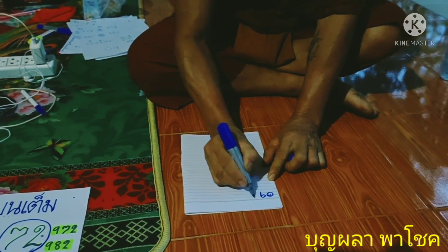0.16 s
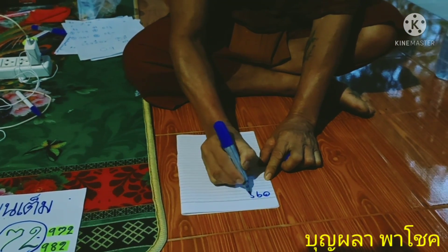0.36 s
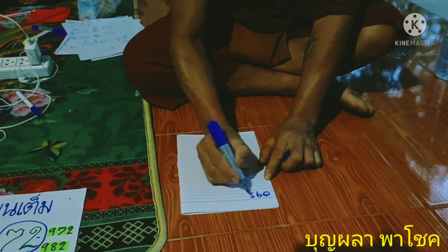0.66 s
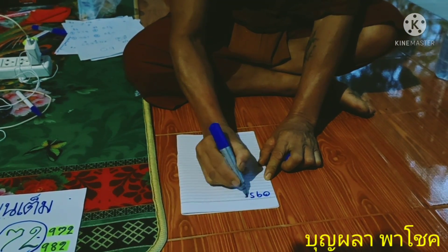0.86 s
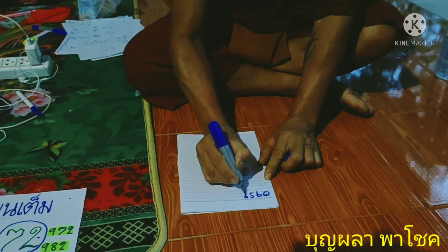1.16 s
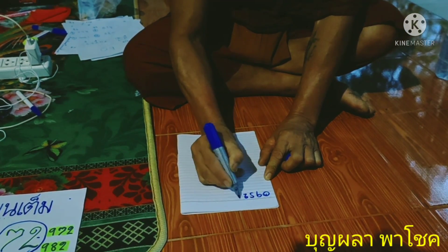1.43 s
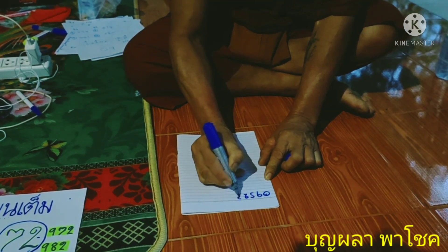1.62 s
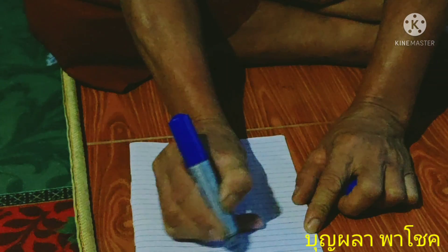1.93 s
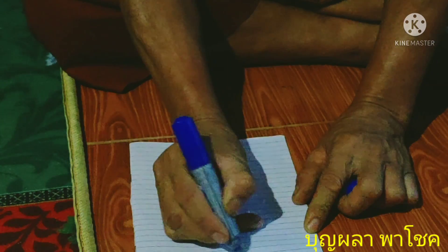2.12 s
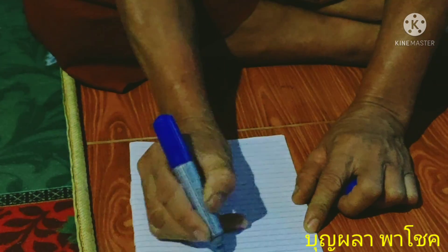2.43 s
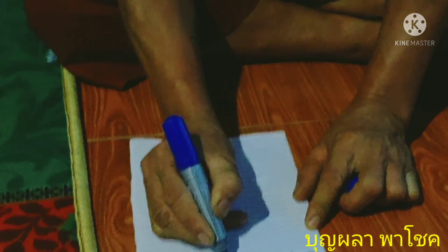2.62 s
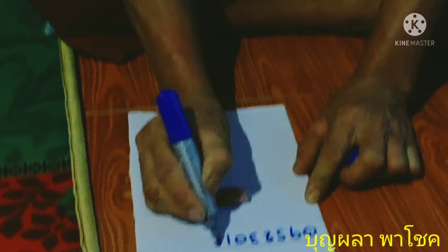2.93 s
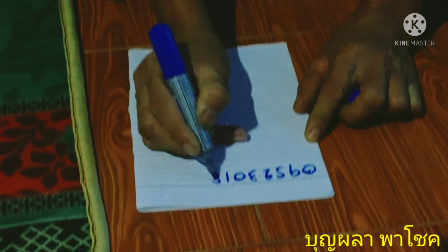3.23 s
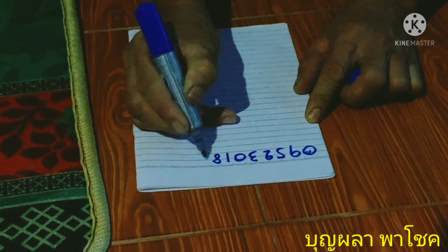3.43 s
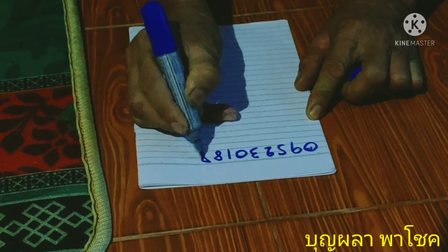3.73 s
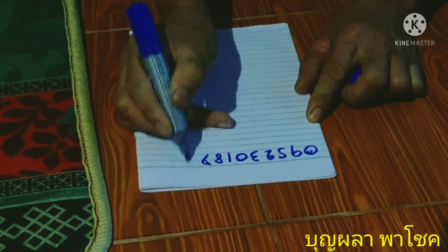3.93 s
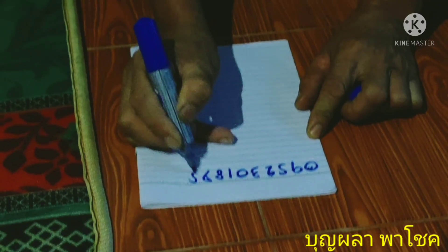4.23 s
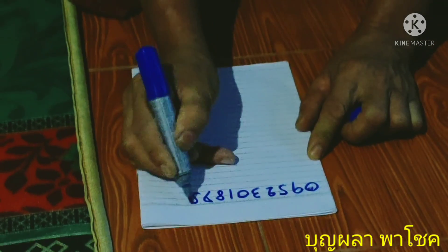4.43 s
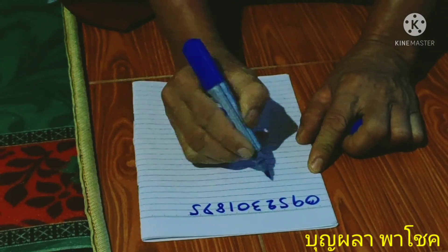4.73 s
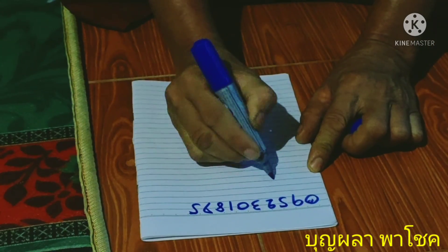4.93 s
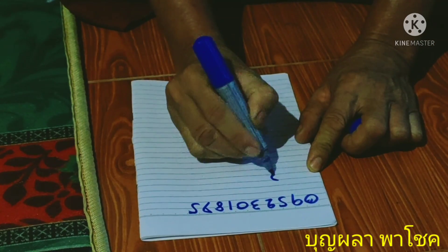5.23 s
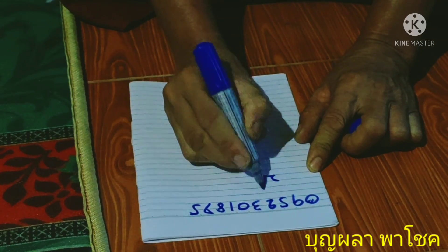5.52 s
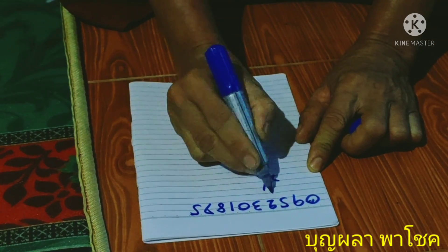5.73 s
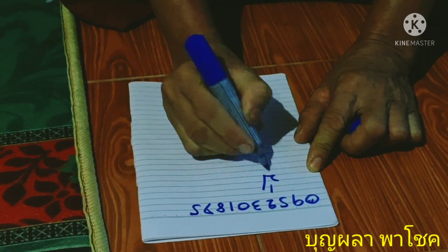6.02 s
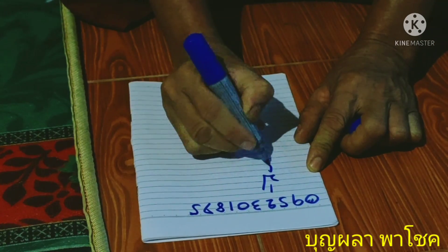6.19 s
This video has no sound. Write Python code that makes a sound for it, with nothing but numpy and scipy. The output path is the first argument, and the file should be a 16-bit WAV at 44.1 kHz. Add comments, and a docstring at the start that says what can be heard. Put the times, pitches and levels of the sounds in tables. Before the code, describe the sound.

A continuous night insect chorus fills about 6.4 seconds, heard from an open porch through a slightly hissy stereo phone microphone. Crickets around 4.5 kHz beat and pulse together, a higher bush-cricket rasps in half-second bouts, and thin fluttering trills slide downward near 5.8 kHz. A felt marker close by ticks and scrapes on a paper pad in quick strokes from 0 to 1.9 s, pauses, then resumes from 2.8 s, with sharper taps at 5.1 and 5.9 s. Soft hand rubs accompany it, clearest near 4.6 s. Distant crickets thicken from about 1.4 s. A gecko gives seven short falling clucks from 2.1 to 3.6 s, weakening. Five bright triple chirps follow from 4.3 to 5.2 s, with faint hollow frog croaks at 4.6, 4.9 and 5.2 s. A distant engine drones low, easing near 4.5 s, then picking up.

```python
"""Night chorus from an open porch

Crickets trill all round, close and far; a bush-cricket rasps in bouts and thin trills slide downwards.
A gecko clucks, a field cricket chirps and a far frog croaks three times: short falling or parting tones.
A marker pen ticks and scrapes on a paper pad near the microphone: shaped noise, with soft rubs of the hand.
Walls and yard scatter nearly every call; a far engine drones in the low rumble and a thin hiss lies on top."""
import sys
import numpy as np
from scipy import signal
from scipy.fft import rfft, irfft
from scipy.io import wavfile
from scipy.ndimage import uniform_filter1d, map_coordinates

SR = 44100
rng = np.random.default_rng(int(sys.argv[2]) if len(sys.argv) > 2 else 0)


def to_wav(s):
    """Save 16-bit WAV."""
    ch = np.atleast_2d(s).T  # columns
    pcm = np.round(np.clip(ch, -1, 1) * 32767)  # PCM
    wavfile.write(sys.argv[1], SR, pcm.astype(np.int16))


N = 280339
T = np.arange(N) / SR

# Rumble of the night air, outline: [f/Hz, level/dB]
AIR_OUTLINE = [(25, -7), (40, 5), (58, 3), (80, 7), (105, -1.5), (140, 3), (180, -7), (230, -9), (300, -15),
               (400, -17.5), (500, -18), (700, -26.5), (1100, -36.5)]
# Thin hiss, outline: [f/Hz, level/dB]
HISS_OUTLINE = [(700, -4.5), (1200, -3), (2000, -0.5), (3300, -0.5), (6000, 1), (11000, 0.5), (13000, -7),
                (15500, -1)]
# Low hums that come and go: [start t/s, length t/s, f/Hz, level/dB]
HUMS = [(-1.3, 4.5, 88, -65), (-.6, 1.9, 139, -63), (2.5, 4.7, 94, -67)]
# Far engine that labours, eases off and picks up: [t/s, firing rate f/Hz, level/dB]
ENGINE_COURSE = [(0, 34.4, -69), (1.0, 34, -67), (3.0, 33.75, -68), (3.7, 33.4, -71), (4.5, 33, -75),
                 (4.8, 34, -71), (5.3, 35.5, -66), (5.8, 35.2, -66.5), (6.36, 35.15, -67)]
# Exhaust harmonics: [multiple of the firing rate, level/dB against the engine]
EXHAUST_HARMONICS = [(4, -4.5), (5, -4), (6, -1.5), (7, -15), (8, -14)]
# Countless far insects, outline: [f/Hz, level/dB]
FAR_OUTLINE = [(3400, -18), (3900, -14), (4300, 0), (4650, 2), (5200, 0), (5550, -4.5), (6200, -6),
               (6900, -15), (8400, -12), (9100, -8), (9900, -9), (10900, -23), (11450, -19), (12100, -42)]
# Crowd of far field crickets: [t/s, level/dB]
CROWD_LEVEL = [(0, -65), (1.1, -65), (1.4, -57), (2.3, -54.5), (2.8, -55.5), (4.2, -54.5), (5.0, -53),
               (5.4, -64), (6.36, -59)]
# Main chorus, before its gain: [t/s, level/dB]
CHORUS_LEVEL = [(0.0, -47), (0.18, -49), (0.26, -45.5), (0.87, -50.5), (1.42, -46.5), (1.57, -55),
                (1.61, -47.5), (2.32, -48), (2.44, -54.5), (2.49, -47), (3.74, -50), (3.91, -47),
                (5.22, -49), (5.26, -44), (5.49, -48.5), (6.25, -47), (6.3, -44), (6.36, -48)]
# Chorus singers, before the chorus is levelled: [wing pitch f/Hz, syllable rate f/Hz, fall in a syllable f/Hz,
# share of the pitch swing, sounding share of a stroke, level/dB, left minus right level/dB, echo level/dB]
SINGERS = [(4460, 38.6, 130, 1, .5, -5.5, -6, -4), (4470, 74.5, 100, .7, .5, -4, 7, -4),
           (4530, 65.4, 50, .4, .6, -4, -3, 0), (4388, 37.5, 10, 1, 1, -4.5, -1, -2),
           (4492, 39, 15, .5, 1, -4.5, -9, -2), (4545, 56, 110, .7, .55, -9, -3, 3),
           (4615, 47, 120, .8, .6, -14, -1, 3)]
# Radiation of cricket wings, outline: [f/Hz, level/dB]
WING_OUTLINE = [(4180, -30), (4300, -3), (4375, 2), (4540, 2.5), (4800, 0), (5200, -7)]
# Bouts of the nearest cricket, before the chorus is levelled: [start t/s, length t/s, syllable level/dB]
NEAR_BOUTS = [(.028, .012, 11), (.083, .012, 8), (.444, .17, 10), (1.854, .2, -2), (2.621, .3, 3),
              (3.1, .2, 6), (5.256, .15, 7), (5.618, .04, 16), (5.893, .012, 16), (5.967, .12, 17),
              (6.12, .04, 8), (6.182, .07, 9), (6.277, .04, 7)]
# Swelling calls of a lower cricket: [crest t/s, level/dB]
LOW_SWELLS = [(-.05, -58), (1.331, -52), (2.679, -51), (4.001, -50.5), (5.289, -51.5), (6.55, -58)]
# Bouts of the bush-cricket: [start t/s, length t/s, level/dB]
BUZZ_BOUTS = [(-.35, 0.65, -55.5), (0.397, .54, -55), (1.19, 0.54, -55), (1.96, 0.79, -55),
              (2.816, 0.71, -55.5), (3.713, 0.55, -54.5), (4.486, 0.51, -53.5), (5.22, 0.55, -54.5),
              (6.01, 0.43, -54.5)]
# Broad wing resonance of the bush-cricket, outline: [f/Hz, level/dB]
BUZZ_OUTLINE = [(6900, -28), (7450, -14), (7720, -3), (7920, 0), (8060, -6), (8400, -17), (9000, -30)]
# Rubs of the writing hand on the pad: [start t/s, length t/s, level/dB]
HAND_RUBS = [(0.036, 0.93, -71.5), (3.153, 0.4, -72), (3.56, 0.5, -68), (4.076, 0.079, -70.5),
             (4.618, 0.21, -62), (4.867, 0.15, -65)]
# Sound of skin on the pad, outline: [f/Hz, level/dB]
SKIN_OUTLINE = [(200, -30), (250, 7), (330, -1.5), (520, 0.5), (750, -5.5), (1200, -16.5)]
# Firm marker strokes, before tick and gain: [start t/s, length t/s, level/dB,
# brightness from -3 or less (dull) to 3 or more (bright)]
MARKER_STROKES = [(0.063, 0.021, -50, 0.5), (0.192, 0.054, -61.5, -5), (0.497, 0.032, -57.5, -0.5),
                  (0.568, 0.041, -56, -5.5), (0.695, 0.054, -54.5, 1.5), (1.044, 0.0021, -65, -2),
                  (1.126, 0.0022, -55, -4.5), (1.16, 0.0027, -50, 2), (1.243, 0.018, -53.5, 0.5),
                  (1.432, 0.034, -54, 2.5), (1.666, 0.03, -60, -5), (1.704, 0.063, -51.5, 4),
                  (1.83, 0.018, -52, 1), (1.863, 0.046, -48.5, -0.5), (2.835, 0.13, -55, 1),
                  (3.166, 0.058, -54, 0.5), (3.389, 0.054, -53, 3), (3.616, 0.11, -56.5, 3),
                  (3.857, 0.072, -53.5, 6), (4.245, 0.079, -54.5, 3), (4.783, 0.059, -55, 2),
                  (4.876, 0.012, -57, -0.5), (5.103, 0.004, -41.5, 1), (5.122, 0.06, -46, 3),
                  (5.703, 0.021, -60, -5), (5.772, 0.025, -51.5, 5), (5.897, 0.005, -44, 1.5),
                  (5.912, 0.028, -46, 3)]
# Resonances of the paper pad, outline: [f/Hz, level/dB]
PAPER_OUTLINE = [(600, -16), (1200, -8.5), (1350, -3), (1560, 6.5), (1850, -4), (2300, 1), (2650, 5.5),
                 (3000, 5.5), (3500, 2), (5500, 5), (8000, 4), (11000, -2), (13500, -8.5), (15500, -31)]
# Thin sliding trills, before flutter and surges: [start t/s, length t/s, first pitch f/Hz, level/dB]
SLIDING_TRILLS = [(.08, .4, 5880, -60), (.5, .5, 5935, -56.5), (1.0, .42, 5700, -59),
                  (1.5, .45, 5835, -56.5), (2.1, .55, 5840, -56.5), (2.8, .5, 5830, -56.5),
                  (3.55, .4, 5800, -60), (3.94, 1.46, 5905, -55), (5.428, .76, 5825, -55),
                  (6.2, .4, 5820, -54.5)]
# Moments when the sliding trills swell: [start t/s, length t/s]
SLIDE_SURGES = [(.51, .1), (3.05, .14), (3.96, .19), (4.37, .11), (4.485, .1), (4.64, .13), (4.84, .13),
                (5.44, .05), (5.55, .09), (5.74, .055), (5.815, .085), (6.085, .07)]
# Gecko clucks, hurrying and on the whole fading: [start t/s, level/dB]
GECKO_CLUCKS = [(2.131, -49), (2.394, -51.5), (2.651, -49.5), (2.895, -51.5), (3.132, -51), (3.355, -55),
                (3.575, -58)]
# Chirps of a field cricket, before the softening of single syllables: [start t/s, level/dB]
FIELD_CHIRPS = [(4.341, -37.5), (4.524, -38.5), (4.707, -38), (4.889, -42), (5.106, -39.5)]
# Frog croaks: [start t/s, level/dB]
FROG_CROAKS = [(4.573, -59), (4.868, -55), (5.227, -57)]

AIR_DB = -59
CHORUS_GAIN_DB, CHORUS_PAN_DB, CHORUS_WANDER_DB = 5.5, -3, -2  # pan is left minus right and wanders
SWING_HZ, SWING_PERIOD_S, SWING_CREST_S = 21.26, 1.028, .374  # the singers' shared pitch swing
SWELL_S = .62  # span of the low cricket's pitch sweep
SLIDE_SAG_HZ = 257  # every sliding trill has sunk this far after one second
SURGE_DB = 5
PAD_SPREAD = .06  # the pad's resonances shift by up to this share from stroke to stroke
TOP_HZ = 15550
MIC_OFFSET = .0055  # share of full scale


def amp(db):
    """Amplitude factor of a level in dB."""
    return 10 ** (np.asarray(db) / 20)


def unit(x):
    """Scale to rms 1."""
    return x / np.sqrt(np.mean(x ** 2) + 1e-20)


def curve(rows):
    """(s, value) points joined by straight lines in time."""
    return np.interp(T, *np.transpose(rows))


def walk(rate):
    """Smooth random drift of spread about 1, with rate knots per second."""
    knots = rng.standard_normal(4096)
    return map_coordinates(knots, [T * rate], order=3, mode="wrap")


def colour(x, points, tilt_db=0):
    """Filter by a (Hz, dB) outline, steep beyond its ends, with an extra slope per octave; rms 1."""
    hz, db = np.transpose(points)
    octave = np.log2(np.fft.rfftfreq(N, 1 / SR) + 1)
    outside = np.abs(octave - np.clip(octave, np.log2(hz[0]), np.log2(hz[-1])))
    gain_db = np.interp(octave, np.log2(hz), db) - 40 * outside
    gain_db = gain_db + tilt_db * (octave - 12)
    return unit(irfft(rfft(x) * amp(gain_db), N))


def pan(db):
    """Left and right gains of equal total power, db apart."""
    gains = amp(np.array([db, -db]).reshape(2, -1) / 2)
    return gains / np.sqrt(np.mean(gains ** 2, axis=0))


def tone(hz):
    """A sine that follows a pitch curve."""
    return np.sin(2 * np.pi * np.cumsum(hz) / SR)


def arch(u):
    """A smooth rise and fall while u goes from 0 to 1."""
    return np.sin(np.pi * np.clip(u, 0, 1))


def yard(x, wet_db, t60):
    """Direct sound plus scattered echoes that die away by 60 dB in t60 s, different at each microphone."""
    t = T[:SR // 2]
    echoes = rng.standard_normal((2, len(t))) * np.exp(-np.log(1000) * t / t60) * (t > .002)
    response = amp(wet_db) * echoes / np.sqrt(np.sum(echoes ** 2, axis=1, keepdims=True))
    response[[0, 1], [0, 2]] += 1  # direct sound, two samples later on the right
    heard = signal.fftconvolve(np.atleast_2d(x), response, axes=1)[:, :N]
    return heard / np.sqrt(1 + amp(2 * wet_db))


def trill(hz, rate, fall_hz, duty, scatter_db):
    """Each closing of the wings rings them for one syllable; the pitch sags as the file slows."""
    beats = np.cumsum(rate * (1 + .012 * walk(6))) / SR + rng.random()
    stroke = np.clip(beats % 1 / duty, 0, 1)
    size = amp(scatter_db * rng.standard_normal(2048))[beats.astype(int)]
    return unit(size * arch(stroke) ** 0.78 * tone(hz + fall_hz * (.5 - stroke)))


def night_air():
    """Far rumble, mostly alike on both sides, wavering hums and a slightly uneven hiss."""
    common = colour(rng.standard_normal(N), AIR_OUTLINE)
    apart = colour(rng.standard_normal((2, N)), AIR_OUTLINE, tilt_db=6.5)
    rumble = amp(AIR_DB) * (common + amp(-8.5) * apart)
    hum = np.zeros(N)
    for start, length, hz, db in HUMS:
        swell = arch((T - start) / length) ** .3
        hum += amp(db) * swell * tone(hz + 1.5 * walk(6)) * amp(2 * walk(6))
    hiss = colour(rng.standard_normal((2, N)) + 0.5 * rng.standard_normal(N), HISS_OUTLINE)
    return rumble + hum + amp(-57.0 + 1.0 * walk(6.1)) * hiss


def far_engine():
    """Only a few low harmonics of the exhaust carry this far; each fades in and out a little on the way."""
    times, rate, db = np.transpose(ENGINE_COURSE)
    hz = np.interp(T, times, rate)
    drone = np.zeros(N)
    for k, k_db in EXHAUST_HARMONICS:
        drone += amp(k_db) * tone(k * hz) * amp(0.97 * walk(2.95))
    return drone * amp(np.interp(T, times, db))


def far_insects():
    """Distant singers merge into a steady shimmering sheet, with one thin high trill above it."""
    shimmer = amp(1.7 * np.array([walk(60), walk(60)]))
    sheet = colour(rng.standard_normal((2, N)) * shimmer, FAR_OUTLINE)
    high = trill(9050 + 35 * walk(3), rate=76, fall_hz=155.5, duty=0.51, scatter_db=5.5)
    high = high * amp(1 * walk(2.5))
    return sheet * amp(-50.0) * pan(-3.5) + yard(high, wet_db=-28, t60=0.33) * amp(-65.0)


def far_field_crickets(count=12):
    """Many field crickets far off: their falling syllables overlap into a dense shimmer."""
    out = 0
    for pitch, pace in rng.random((count, 2)):
        hz = 4900 + 300 * pitch + 15 * walk(20)
        out = out + trill(hz, rate=26 + 9 * pace, fall_hz=620, duty=.55, scatter_db=1.5)
    return unit(yard(out, wet_db=6, t60=.2)) * amp(curve(CROWD_LEVEL)) * pan(-3.5)


def far_sliders(low_hz, high_hz, db, count):
    """Sliding singers far away, each sinking a few percent and starting over."""
    out = np.zeros(N)
    for pitch, offset, pace in rng.random((count, 3)):
        u = (offset + T * (.6 + .6 * pace)) % 1
        hz = (low_hz + (high_hz - low_hz) * pitch) * (1 - .04 * u + .003 * walk(120))
        out += arch(u) ** .5 * amp(3.3 * walk(23)) * tone(hz)
    return yard(unit(out), wet_db=0, t60=0.18) * amp(db)


def chorus():
    """Near crickets on almost one pitch beat together; their wings hardly radiate below resonance."""
    out = near_cricket()
    swing = SWING_HZ * np.cos(2 * np.pi * (T - SWING_CREST_S) / SWING_PERIOD_S)
    for hz, rate, fall_hz, share, duty, db, pan_db, wet_db in SINGERS:
        song = trill(hz + share * swing + 4 * walk(4), rate, fall_hz, duty, scatter_db=1)
        heard = yard(song * amp(2 * walk(2.96)), wet_db=wet_db, t60=.22)
        out = out + heard * amp(db) * pan(pan_db)
    out = colour(out, WING_OUTLINE)
    # level each side over a seventh of a second, then impose the level curve
    loudness = np.sqrt(uniform_filter1d(out ** 2, SR // 7, axis=1))
    side_gains = pan(CHORUS_PAN_DB + CHORUS_WANDER_DB * walk(12.0))
    return out / loudness * amp(curve(CHORUS_LEVEL) + CHORUS_GAIN_DB) * side_gains


def low_cricket(crest_hz=4050, edge_hz=4290):
    """As it sings harder its pitch drops and its syllables sweep further down."""
    push = sum(arch((T - s) / SWELL_S + .5) for s, _ in LOW_SWELLS)
    hz = edge_hz + (crest_hz - edge_hz) * push
    song = trill(hz + 25 * walk(60), rate=30, fall_hz=120 + 70 * push, duty=.65, scatter_db=3.0)
    effort = sum(amp(db) * np.exp(-np.abs(T - s) / (0.28 * SWELL_S)) for s, db in LOW_SWELLS)
    return yard(song * effort, wet_db=5, t60=0.2) * pan(-4)


def bush_cricket(rate=107, lull_db=-62.0):
    """Rapid rasping strokes run together in a broad wing resonance; a faint rasp fills the lulls."""
    beats = np.cumsum(rate * (1 + 0.0075 * walk(9.4))) / SR
    strokes = 1.7 + arch(beats % 1) ** 2
    noise = rng.standard_normal((2, N)) + 0.5 * rng.standard_normal(N)  # partly alike on both sides
    rasp = colour(strokes * noise, BUZZ_OUTLINE)
    effort = sum(amp(db) * arch((T - start) / length) ** 0.2 for start, length, db in BUZZ_BOUTS)
    return rasp * np.hypot(uniform_filter1d(effort, SR // 40), amp(lull_db)) * pan(-5.0)


def near_cricket(rate=39.2, duty=0.39, top_hz=4510, fall_hz=150):
    """Short bouts of evenly spaced, clearly separate syllables that fall in pitch."""
    out = np.zeros(N)
    for start, length, db in NEAR_BOUTS:
        age = T - start
        stroke = np.clip(age * rate % 1 / duty, 0, 1)
        gate = np.clip(np.minimum(age, length - age) / .002, 0, 1)  # 2 ms edges
        out += amp(db) * gate * arch(stroke) * tone(top_hz - fall_hz * stroke)
    return yard(out, wet_db=-8, t60=.25)


def hand():
    """The edge of the hand shifts over the pad in soft uneven rubs."""
    rub = colour(rng.standard_normal(N) * amp(3 * walk(25)), SKIN_OUTLINE)
    pressure = sum(amp(db) * arch((T - s) / length) ** .5 for s, length, db in HAND_RUBS)
    return yard(rub * pressure, wet_db=-5.5, t60=0.26)


def marker(release=0.011, attack=0.00024, landing_db=5, snag_db=-6):
    """The felt tip lands with a tick, then catches on fibres: a grainy scrape coloured by the pad."""
    snags = (rng.random(N) < 350 / SR) * rng.standard_normal(N)  # about 350 per second
    grit = rng.standard_normal(N) * amp(2.1 * walk(500) + 0.84 * walk(110))
    grains = unit(grit) + amp(snag_db) * unit(snags)
    dull = colour(grains, PAPER_OUTLINE, tilt_db=-2.0)
    bright = colour(grains, PAPER_OUTLINE, tilt_db=5)
    out = np.zeros(N)
    for start, length, db, brightness in MARKER_STROKES:
        span = slice(int(start * SR) + 1, int(start * SR) + SR // 2)
        age = T[span] - start
        lift = np.exp(-np.maximum(age - length, 0) / min(release, length))
        press = np.minimum(age / attack, 1) * lift
        tick = amp(landing_db * np.exp(-age / 0.012))
        share = np.interp(brightness, [-3, 3], [0, 1])
        # reading the scrape faster or slower shifts its resonances
        pace = 1 + PAD_SPREAD * rng.uniform(-1, 1)
        scrape = np.interp(start + age * pace, T, dull + share * (bright - dull))
        out[span] += amp(db) * press * tick * scrape
    return yard(out, wet_db=1.5, t60=.08) * amp(1.86) * pan(-0.97)


def sliders():
    """Thin fluttering trills start high, sink ever more slowly and surge, with a faint octave."""
    out = np.zeros(N)
    surge = sum(arch((T - s) / length) ** .5 for s, length in SLIDE_SURGES)
    flutter = amp(1.5 * walk(45) + SURGE_DB * surge)
    waver = 6 * walk(110)
    for start, length, first_hz, db in SLIDING_TRILLS:
        age = np.maximum(T - start, 0)
        hz = first_hz - SLIDE_SAG_HZ * age ** .8 + waver
        out += amp(db) * arch(age / length) ** .2 * (tone(hz) + amp(-19) * tone(2 * hz))
    return yard(out * flutter, wet_db=-9, t60=.2) * pan(-3)


def gecko(length=0.0189, top_hz=2560, fall_hz=950):
    """Each cluck is a short, slightly hoarse downward squeak that hangs under the roof."""
    out = np.zeros(N)
    hoarse = 330 * walk(1500)
    for start, db in GECKO_CLUCKS:
        u = np.clip((T - start) / length, 0, 1)
        out += amp(db) * arch(np.sqrt(u)) * tone(top_hz - fall_hz * u + hoarse)
    return yard(out, wet_db=0, t60=.4)


def field_cricket(step=0.032, length=0.02, top_hz=5490, fall_hz=440):
    """Chirps of three syllables, the first softest; each starts firmly and fades as it falls."""
    out = np.zeros(N)
    waver = 25 * walk(150)
    for start, db in FIELD_CHIRPS:
        for k, effort_db in enumerate([-3, 0, -1]):
            onset = start + k * step + 0.0014 * rng.standard_normal()
            u = np.clip((T - onset) / length, 0, 1)
            out += amp(db + effort_db) * arch(u ** .6) * tone(top_hz - fall_hz * u + waver)
    return yard(out, wet_db=0, t60=.3) * pan(-1.0)


def frog(length=0.03):
    """A brief hollow croak whose two throat resonances part as the sac empties."""
    out = np.zeros(N)
    rough = 22 * walk(250)
    for start, db in FROG_CROAKS:
        u = np.clip((T - start) / length, 0, 1)
        rising = tone(460 + 160 * u + rough)
        falling = tone(450 - 110 * u + rough)
        out += amp(db) * arch(u) * (rising + amp(-1.0) * falling)
    return yard(out, wet_db=-10, t60=.25)


def scene():
    """The porch and the yard beyond it, heard at the microphones."""
    distance = night_air() + far_engine() + far_insects() + far_field_crickets()
    distance = distance + far_sliders(4800, 6250, db=-62.0, count=18)
    distance = distance + far_sliders(9300, 10500, db=-64.5, count=4)
    crickets = chorus() + low_cricket() + bush_cricket() + sliders() + field_cricket()
    return distance + crickets + hand() + marker() + gecko() + frog()


def record(dry):
    """The phone's microphones cut the top steeply and sit slightly off zero."""
    top_cut = signal.ellip(12, .2, 70, TOP_HZ, fs=SR, output="sos")
    return signal.sosfilt(top_cut, dry) + MIC_OFFSET


dry = scene()
out = record(dry)
to_wav(out)
```